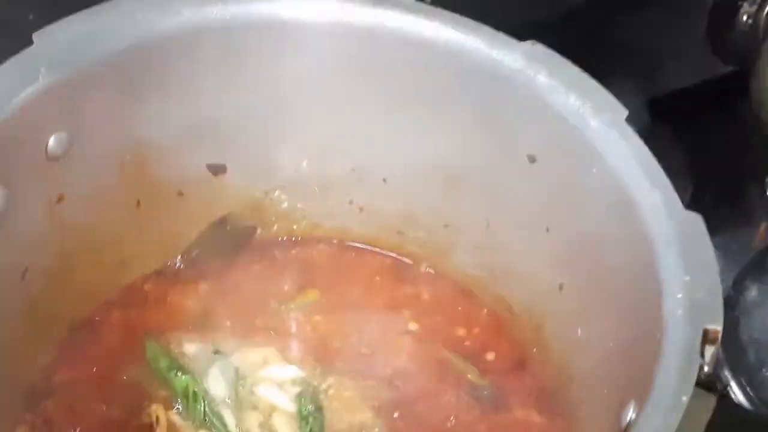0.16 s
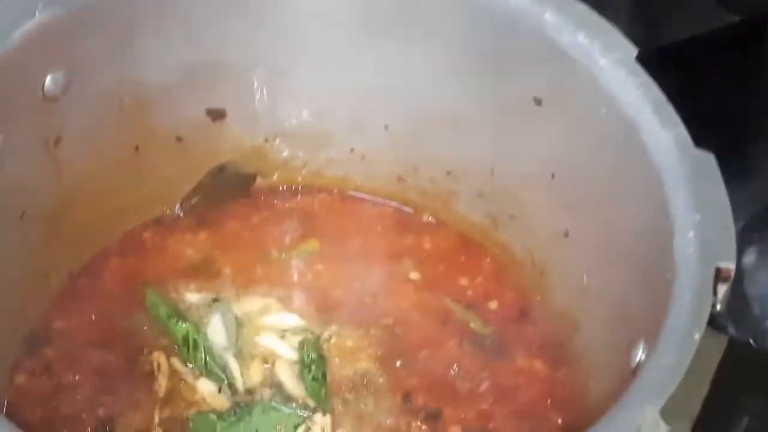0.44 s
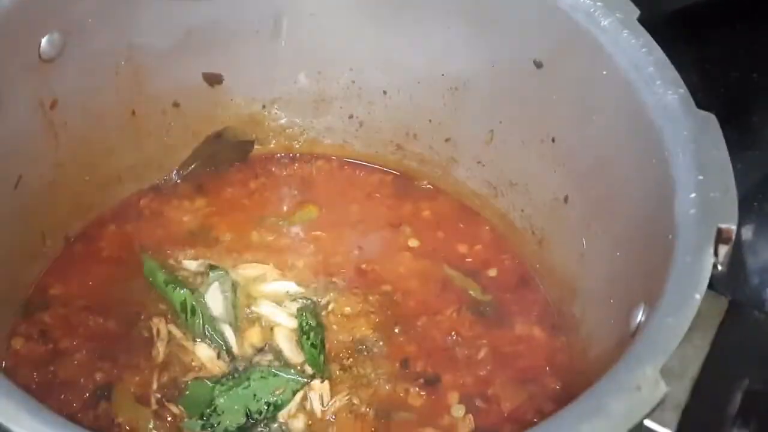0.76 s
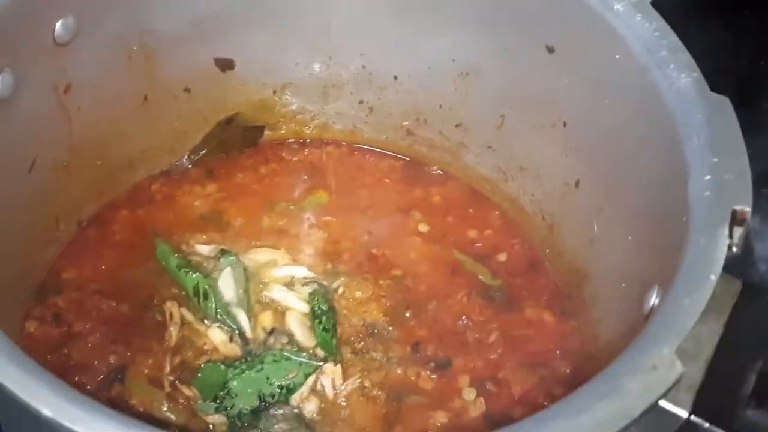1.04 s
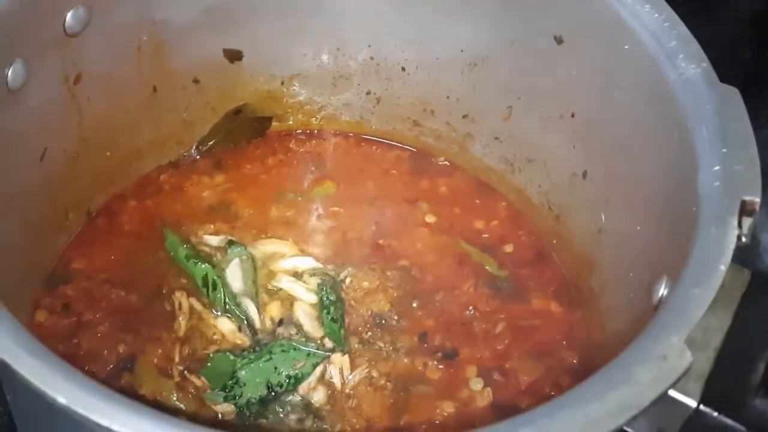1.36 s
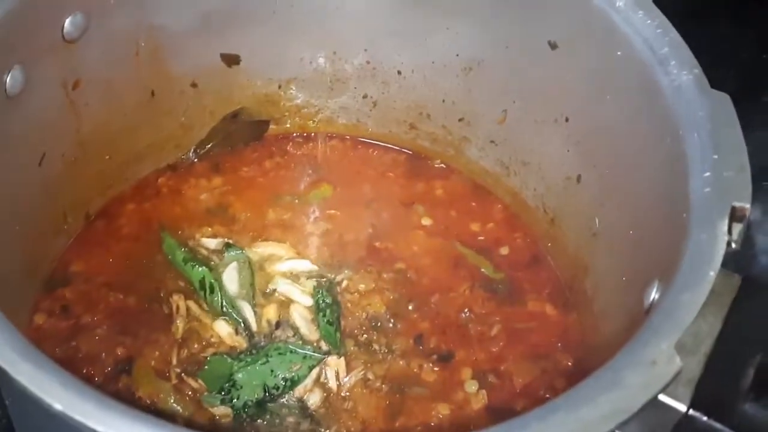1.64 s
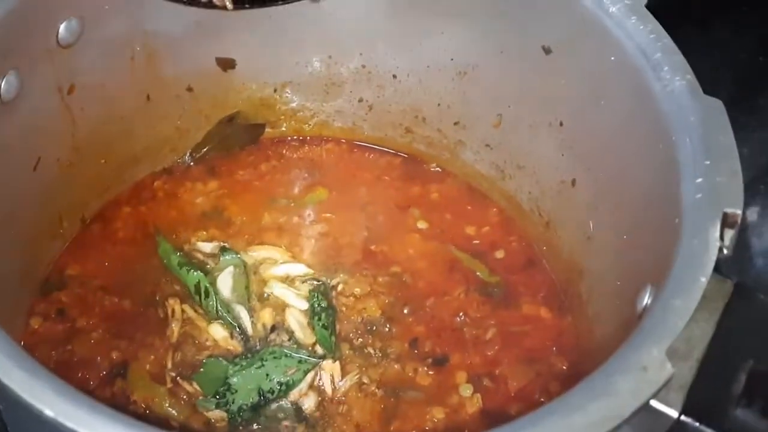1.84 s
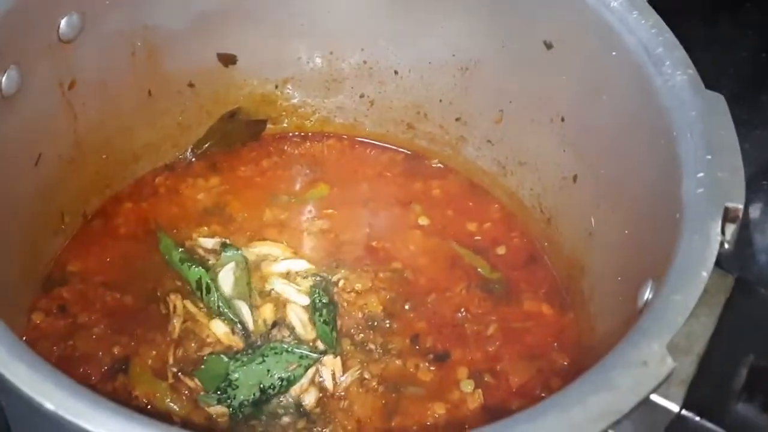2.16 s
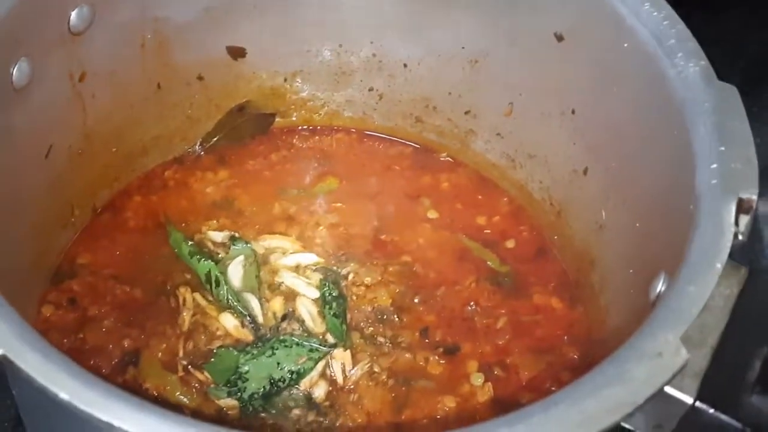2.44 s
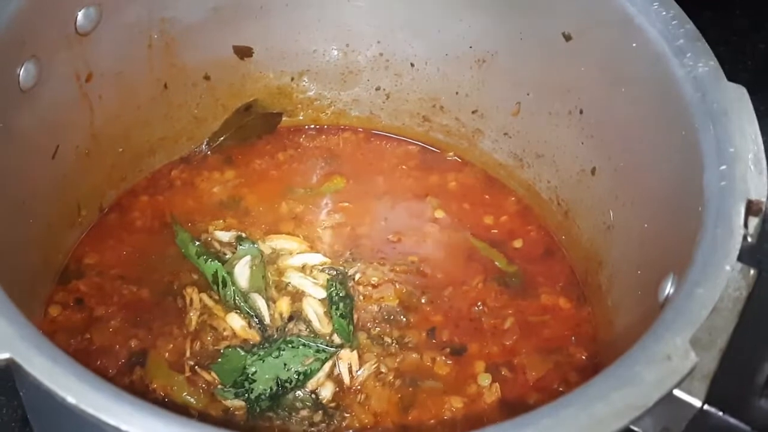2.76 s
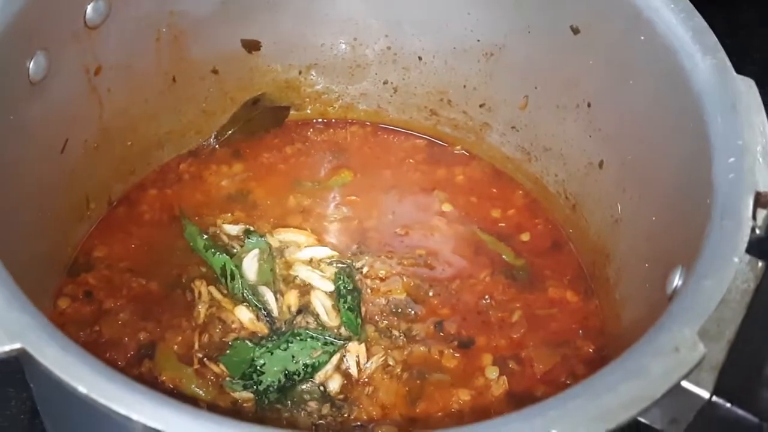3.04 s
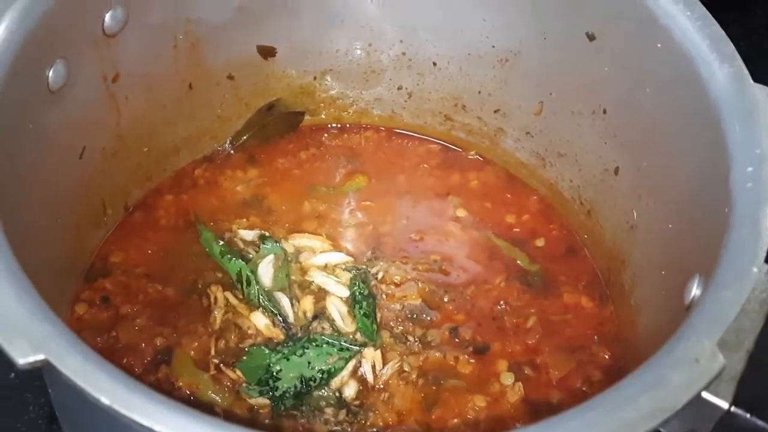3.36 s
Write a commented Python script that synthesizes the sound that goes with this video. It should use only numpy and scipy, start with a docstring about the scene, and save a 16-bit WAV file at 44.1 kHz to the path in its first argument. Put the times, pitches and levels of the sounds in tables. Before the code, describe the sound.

Loud bright sizzle of hot oil hitting lentil stew, dying away into small spits and pops

```python
"""In a kitchen, hot spiced oil lies on wet lentils in a deep metal pot.
Countless tiny steam bubbles burst as random clicks in broad pitch bands, dense at first, then fading.
Bigger bubbles excite the pot's resonances; single spits are decaying noise cracks with a spray behind.
Swelling noise bands make large bubbles, and filtered clicks make drops on the pot wall.
Behind lie low room tones and air made of filtered noise, and dull thuds made of short sine pulses."""
import sys
import numpy as np
from scipy import signal
from scipy.fft import rfft, irfft, next_fast_len
from scipy.io import wavfile
from scipy.ndimage import map_coordinates

SR = 44100
rng = np.random.default_rng(int(sys.argv[2]) if len(sys.argv) > 2 else 0)


def materialize(psi):
    """Save the field psi as 16-bit PCM at rate SR to the path in sys.argv[1].

    A 1-D psi becomes a single channel; in a 2-D psi each row is a channel.
    """
    bounded = np.clip(np.atleast_2d(psi).T, -1, 1)
    quanta = np.round(bounded * 32767).astype(np.int16)
    wavfile.write(sys.argv[1], SR, quanta)


N = 154350
T = np.arange(N) / SR  # time [s]


def amp(db):
    """Decibel law: amplitude ratio of a level in dB."""
    return 10 ** (np.asarray(db) / 20)


def unit(x):
    """Power normalization: scale to an RMS of one."""
    return x / np.sqrt(np.mean(x ** 2) + 1e-20)


def follow(table, column=1):
    """Linear interpolation in time: one level column of a table whose first column is time."""
    columns = np.transpose(table)
    return np.interp(T, columns[0], columns[column])


def wobble(rate):
    """Slow random modulation: a smooth curve through `rate` random knots a second."""
    knots = rng.standard_normal(int(N * rate / SR) + 4)
    return map_coordinates(knots, [T * rate])


def shape(points):
    """Spectral envelope: gain through (frequency [Hz], level [dB]) points on a log frequency axis."""
    hz, db = np.transpose(points)
    return lambda f: amp(np.interp(np.log(f + 1), np.log(hz + 1), db))


def modes(table):
    """Modal superposition: causal second-order resonances summed with alternating sign."""
    def response(f):
        total = 0
        for k, (centre, width, db) in enumerate(table):
            resonance = 1j * f * width / (centre * centre - f * f + 1j * f * width)
            total = total + (-1) ** k * amp(db) * resonance
        return total
    return response


def filtered(x, response):
    """Linear filtering: the spectrum of x times a response of frequency, padded by half a second."""
    m = next_fast_len(N + SR // 2)
    f = np.fft.rfftfreq(m, 1 / SR) + 1e-3
    return irfft(rfft(x, m) * response(f), m)[..., :N]


BIGGEST_DB = 12  # cap on the exponential size scatter


def bursts(rate, spread_db):
    """Shot noise: independent random clicks at a mean rate per second, a few of them much bigger."""
    happens = rng.random(N) < rate / SR
    size = amp(np.minimum(spread_db * rng.exponential(size=N), BIGGEST_DB))
    return unit(happens * rng.standard_normal(N) * size)


POT_ECHO_S, ECHO_DB = 0.085, 5  # 60 dB decay time; echo level relative to the click


def echoed(x):
    """Diffuse reflection: the pot walls answer each click; the answer changes as the surface moves."""
    t, step = np.arange(SR // 10) / SR, SR // 8
    out = np.pad(x, (0, SR))
    for a in range(0, N, step):
        tail = rng.standard_normal(len(t)) * amp(-60 * t / POT_ECHO_S)
        wet = signal.fftconvolve(x[a:a + step], amp(ECHO_DB) * tail / np.linalg.norm(tail))
        out[a:a + len(wet)] += wet
    return out[:N]


# Spectral envelope of the fierce fizz: (frequency [Hz], relative density [dB per Hz])
FIERCE_COLOUR = [(1000, -24.5), (2000, -29), (2950, -24.5), (3300, -11.5), (3760, -9.5), (4210, -8.5),
                 (5940, -8.5), (6900, -6), (7740, -6), (9390, 1.5), (11500, -6), (15600, -21.5)]
# Spectral envelope of the thinner dying fizz: (frequency [Hz], relative density [dB per Hz])
DYING_COLOUR = [(1650, -18), (2800, -40), (3780, -15.5), (4520, -10.5), (6380, -6.5), (8000, -5.5),
                (8800, 1), (9460, 0.5), (10200, -1), (11200, -7), (11700, -20), (15600, -29)]


def coloured(x, share):
    """Spectral crossfade: the fierce and dying colours of x, weighted by the dying share (0-1)."""
    fierce = (1 - share) * unit(filtered(x, shape(FIERCE_COLOUR)))
    dying = share * unit(filtered(x, shape(DYING_COLOUR)))
    return fierce + dying


FIZZ_RATE, FIZZ_SPREAD_DB = 4000, 1  # bursts a second; size scatter
FIERCE_DB, DYING_DB = -38, -59  # fizz levels at which each colour rules alone
HISS_DB, HISS_SWING_DB = -0.5, 1.5  # middle hiss level under the pops; its fall from fierce to dying
BUBBLE_WIDTH = 1  # band width over pitch
# Pitch classes of the small bubbles: one column, (frequency [Hz])
BUBBLE_HZ = [2700, 4330, 6000, 8650, 11700, 14500]
# Sizzle levels before wobble: (time [s], fine fizz [dB], big bubbles [dB], deep simmer [dB])
SIZZLE_LEVEL = [(0.0, -30, -45.5, -58.5), (0.12, -31, -47, -57), (0.3, -32.5, -46, -60.5),
                (0.54, -33.5, -51, -74), (0.55, -32, -46.5, -68), (0.59, -33, -53, -72),
                (0.78, -33, -49.5, -64), (0.88, -34, -50, -62.5), (0.94, -35.5, -52.5, -67.5),
                (1.02, -35.5, -55, -70.5), (1.39, -40.5, -67, -71), (1.58, -40.5, -73, -72.5),
                (1.76, -45.5, -65.5, -71.5), (1.83, -41, -61, -71), (1.94, -46, -66.5, -69),
                (2.1, -48, -89, -83), (2.11, -44, -71, -72), (2.32, -50, -79, -75.5),
                (2.63, -52, -81, -79.5), (2.87, -56.5, -81, -83), (3.08, -56.5, -85, -89),
                (3.22, -61.5, -82, -88), (3.3, -61, -86, -89), (3.5, -63.5, -90, -87)]
# Side noise filter: (frequency [Hz], gain [dB])
SIDE_FILTER = [(5000, -73), (10000, -99), (12500, -16.5), (15600, 1)]


def fizz():
    """Superposed bubble bursts: banded clicks with echo and hiss in mid, separate treble noise in side."""
    fine_db = follow(SIZZLE_LEVEL, 1)
    wobble_db = 0.4 * wobble(5.62) + 0.33 * wobble(24.7) + 0.39 * wobble(49.7)
    level = amp(fine_db + wobble_db)
    share = np.clip((fine_db - FIERCE_DB) / (DYING_DB - FIERCE_DB), 0, 1)  # dying share
    pops = np.zeros(N)
    for hz in BUBBLE_HZ:
        clicks = bursts(FIZZ_RATE / len(BUBBLE_HZ), FIZZ_SPREAD_DB)
        pops += filtered(clicks, modes([(hz, BUBBLE_WIDTH * hz, 0)]))
    hiss = amp(HISS_DB + HISS_SWING_DB * (0.5 - share)) * rng.standard_normal(N)
    mid = level * coloured(unit(echoed(pops)) + hiss, share)
    side = filtered(level * coloured(rng.standard_normal(N), share), shape(SIDE_FILTER))
    return mid, side


BUBBLE_RATE, BUBBLE_SPREAD_DB = 1500, 2.5  # bursts a second; size scatter
# Pot resonances, upper, middle and lowest: (frequency [Hz], width [Hz], relative level [dB])
POT_HIGH = [(1660, 94, -12), (1929, 97, -3.5), (2097, 162, -7), (2303, 100, -2), (2618, 107, -1.5),
            (3090, 43, 1), (3290, 136, -6.5), (3720, 35, -8.5), (4550, 230, -24)]
POT_MID = [(955, 90, -3), (1230, 85, 0), (1420, 170, -8)]
POT_LOW = [(468, 46, 4), (598, 125, 1)]
# Level of the simmer in the middle resonances, before wobble: (time [s], level [dB])
GURGLE_LEVEL = [(0, -53.5), (.12, -56), (.44, -63), (.62, -67), (.78, -58.5), (.95, -65.5), (1.15, -67.5),
                (1.65, -79.5), (1.82, -72.5), (2.08, -80), (2.6, -86), (3.5, -85)]


def pot_bubbles():
    """Forced resonance: echoed bursts and noise excite three groups of pot modes."""
    def ring(table):
        drive = echoed(bursts(BUBBLE_RATE, BUBBLE_SPREAD_DB)) + rng.standard_normal(N)
        return unit(filtered(drive, modes(table)))

    big = ring(POT_HIGH) * amp(follow(SIZZLE_LEVEL, 2) + 0.6 * wobble(12))
    gurgle = ring(POT_MID) * amp(follow(GURGLE_LEVEL) + 1.1 * wobble(7.9))
    deep = ring(POT_LOW) * amp(follow(SIZZLE_LEVEL, 3) + 0.6 * wobble(12))
    return big + gurgle + deep


# Pot wall modes: (frequency [Hz], width [Hz], relative level [dB])
WALL_MODES = [(2358, 33, -1), (2550, 23, -22), (3140, 63, -8.5), (3743, 34, 2)]
# Level of the wall ring before wobble: (time [s], level [dB])
WALL_LEVEL = [(0, -58), (1, -61.5), (1.4, -61), (1.95, -65.5), (2.1, -77), (2.5, -78), (2.7, -77),
              (3.1, -81), (3.5, -90)]


def wall_ring():
    """Sustained modal ringing: a stream of fine bursts keeps the wall modes alive."""
    ring = unit(filtered(bursts(FIZZ_RATE, 0.56), modes(WALL_MODES)))
    return ring * amp(follow(WALL_LEVEL) + 2.4 * wobble(11.07))


CRACK_S = 0.008  # 60 dB decay time of a crack's noise; also the time constant of the spray's rise
CRACK_WIDTH = 0.45  # width over pitch of the crack band, which is applied twice
SPRAY_RING_DB = -10  # how strongly a spray rings the pot
# Single spits: (time [s], crack peak level [dB], crack pitch [Hz],
# spray peak relative to crack, capped at 0 [dB], spray 60 dB decay time, held to 0.01-0.3 [s],
# dying colour share [0-1])
SPITS = [(0.3872, -25, 8850, -16, .02, .3), (0.6392, -18, 11160, -19, .02, .3),
         (1.2341, -32, 7000, 2, 0.045, 1), (1.301, -35.5, 4240, 1, 0.034, .4),
         (1.5586, -26, 9100, -5.5, 0.024, .3), (1.93, -34, 8000, -1, 0.029, 0),
         (1.939, -38, 6000, -22, 0.018, .3), (2.1406, -33.5, 7840, 2, 0.042, 0.2),
         (2.508, -31, 8900, -5, 0.19, 0.8), (2.544, -30, 6500, -2, 0.045, 0),
         (2.56, -38.5, 9000, 0.5, 0.37, 0.4), (2.659, -47, 9200, -15, 0.018, .9),
         (2.738, -40.5, 6930, -7, 0.022, 0.8), (2.804, -40.5, 8500, -7, .02, 0.8),
         (2.892, -52, 5000, -15, .02, .9), (2.9606, -42.5, 9200, -11, .02, 0.9),
         (3.0106, -44, 9200, -14, .02, 1), (3.034, -46, 6600, -12, 0.022, 0.7),
         (3.075, -49, 5650, 3, 0.042, 1), (3.1477, -47, 9000, -12, .02, 0.7),
         (3.285, -46, 9250, -10, 0.043, 0.9), (3.3453, -48.5, 7200, -12, 0.025, 0.8)]


def spits():
    """Transient decay: a short noise crack around its own pitch, then a spray that also rings the pot."""
    out = np.zeros(N)
    for s, db, hz, spray_db, t60, share in SPITS:
        grain_db = 2 * rng.standard_normal(N // 40 + 1).repeat(40)[:N]  # uneven in 40-sample grains
        noise = rng.standard_normal(N) * amp(grain_db) * (T >= s)
        age = np.abs(T - s)
        band = modes([(hz, CRACK_WIDTH * hz, 0)])
        crack = filtered(noise * amp(-60 * age / CRACK_S), lambda f: band(f) ** 2)
        crack = coloured(crack, share)
        fall = amp(-60 * age / np.clip(t60, 0.01, 0.3))
        drops = noise * fall * (1 - np.exp(-age / CRACK_S))
        pot_ring = filtered(unit(drops), modes(POT_HIGH + POT_MID))
        spray = coloured(drops, share) + amp(SPRAY_RING_DB) * pot_ring
        crack = crack / np.abs(crack).max()
        spray = amp(min(spray_db, 0)) * spray / np.abs(spray).max()
        out += amp(db) * (crack + spray)
    return out


# Large bubbles, swelling for a third of their length:
# (time [s], nominal peak level [dB], pitch [Hz], one-pass band width over pitch [1], length [s])
BLOPS = [(0.719, -29, 4500, 0.24, 0.031), (0.735, -26, 2400, .3, 0.025), (0.764, -35, 2180, 0.26, .02),
         (0.773, -39, 2270, .2, 0.013), (1.666, -47.5, 2350, .12, 0.012), (3.482, -43, 6000, 0.22, 0.0061)]


def blops():
    """Band-limited noise pulse: each large bubble swells and falls around one pitch."""
    out = np.zeros(N)
    for s, db, hz, width, length in BLOPS:
        u = np.clip((T - s) / length, 0, None)
        band = modes([(hz, width * hz, 0)])
        noise = unit(filtered(rng.standard_normal(N), lambda f: band(f) ** 2))
        swell = 3 * u * np.exp(1 - 3 * u)
        out += amp(db - 11.5) * swell * noise  # 11.5 dB allows for noise peaks above RMS
    return out


TICK_WIDTH_HZ, TICK_RING_DB = 4500, 0  # one-pass click band width; pot ring level
# Dry drops on the pot wall: (time [s], relative strength [dB], click pitch [Hz])
TICKS = [(1.787, -33, 2200), (1.834, -36, 2600), (2.98, -43, 3100)]


def ticks():
    """Impulse response: each drop is one click through a broad band and the pot resonances."""
    out = np.zeros(N)
    pot = modes(POT_LOW + POT_MID + POT_HIGH)
    for s, db, hz in TICKS:
        click = modes([(hz, TICK_WIDTH_HZ, 0)])
        blow = 3 * amp(db) * (np.arange(N) == round(s * SR))
        out += filtered(blow, lambda f: click(f) ** 2 + amp(TICK_RING_DB) * pot(f))
    return out


# Room tones, each value for one of two filter passes:
# (frequency [Hz], one-pass width [Hz], one-pass relative level [dB])
HUM_MODES = [(41, 7.2, -4.5), (78, 15.4, -2), (122.6, 44, -4.5), (159.2, 19, -1.5), (205, 43.4, -8)]
# Hum level before wobble: (time [s], level [dB])
HUM_LEVEL = [(0, -67.5), (.9, -65.5), (1.8, -66), (2.7, -65), (3.5, -68.5)]


def hum():
    """Resonant filtering: noise passed twice through low room tones, wavering in level."""
    tones = modes(HUM_MODES)
    noise = unit(filtered(rng.standard_normal(N), lambda f: tones(f) ** 2))
    return amp(follow(HUM_LEVEL) + wobble(5.1)) * noise


AIR_DB = -75  # RMS level
# Spectral envelope of the air: (frequency [Hz], relative density [dB per Hz])
AIR_COLOUR = [(25, -15), (250, 16), (500, 8.5), (1000, 1.5), (3000, -5), (9300, -32), (15600, -37)]


def air():
    """Stationary noise: faint and steady with a fixed spectral envelope."""
    return amp(AIR_DB) * unit(filtered(rng.standard_normal(N), shape(AIR_COLOUR)))


# Soft far thuds: (time of centre [s], envelope peak level [dB], pitch [Hz], length between 1/e points [s])
THUDS = [(1.124, -64, 93.5, 0.22), (1.3, -59.5, 160.5, 0.14), (1.527, -59.5, 81.7, 0.12),
         (1.72, -66, 156, 0.1), (1.95, -62.5, 157, 0.11), (2.08, -66, 160, .1), (2.36, -57, 154.6, 0.074),
         (2.546, -61.5, 78, 0.19), (2.696, -59.5, 78, 0.088), (3.12, -66.5, 75, 0.18),
         (3.403, -66, 82.3, 0.18)]


def thuds():
    """Gaussian tone bursts: each thud is a low sine under a bell-shaped envelope."""
    out = np.zeros(N)
    for s, db, hz, length in THUDS:
        age = T - s
        out += amp(db) * np.exp(-(2 * age / length) ** 2) * np.sin(2 * np.pi * hz * age)
    return out


def scene():
    """Mid-side stereo: everything at the centre, plus a faint separate treble noise in the side."""
    mid, side = fizz()
    mid = mid + pot_bubbles() + wall_ring() + spits() + blops() + ticks()
    mid = mid + hum() + air() + thuds()
    return np.array([mid + side, mid - side])


TOP_HZ = 15660  # upper band limit


def record(dry):
    """Band limitation: nothing sounds above the upper limit."""
    return filtered(dry, lambda hz: hz < TOP_HZ)


dry = scene()
out = record(dry)
materialize(out)
```